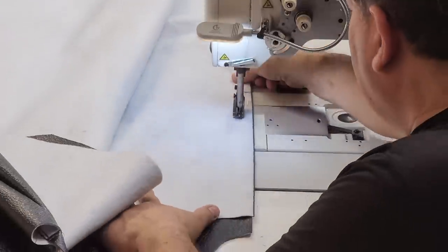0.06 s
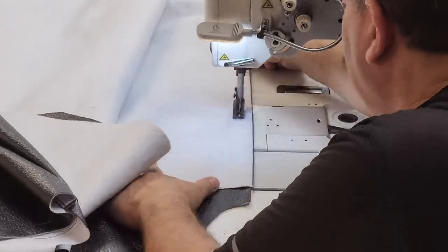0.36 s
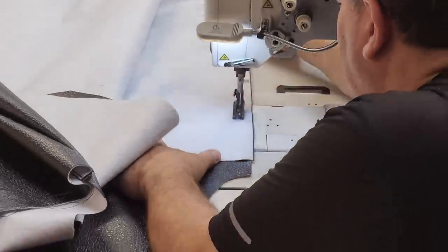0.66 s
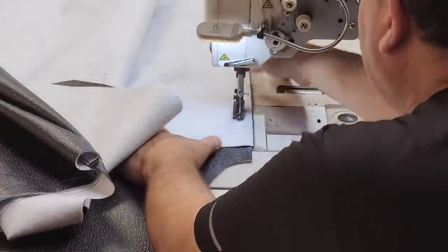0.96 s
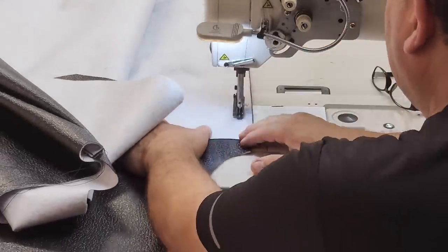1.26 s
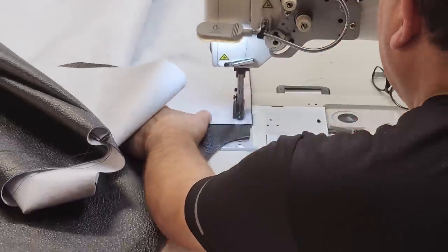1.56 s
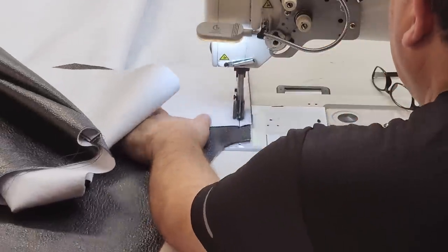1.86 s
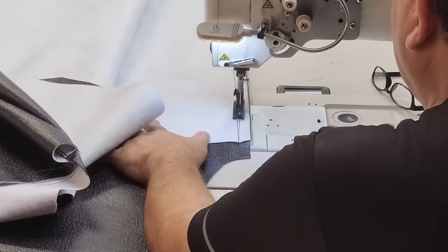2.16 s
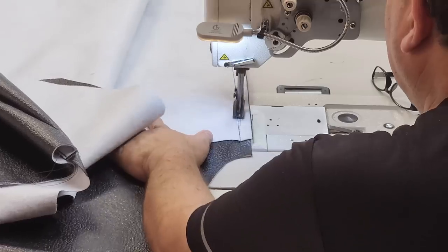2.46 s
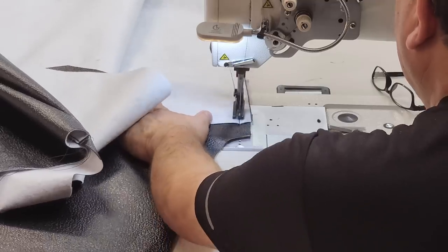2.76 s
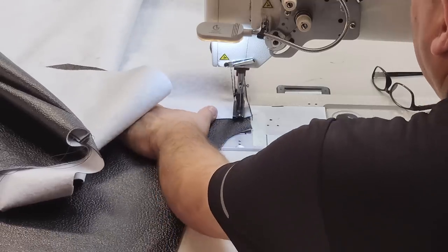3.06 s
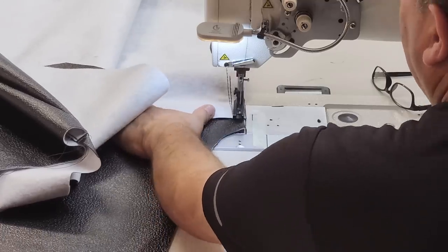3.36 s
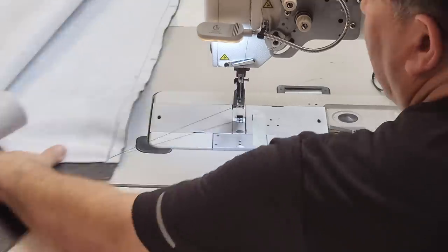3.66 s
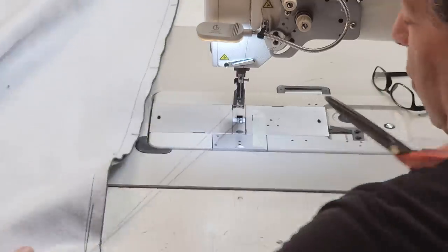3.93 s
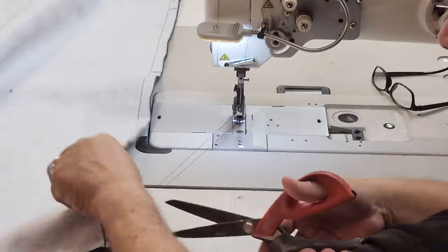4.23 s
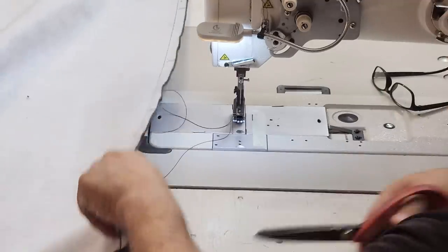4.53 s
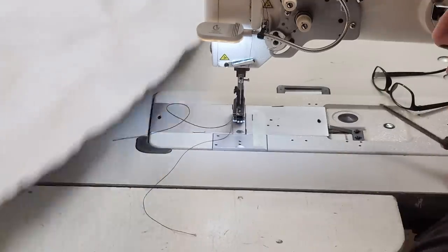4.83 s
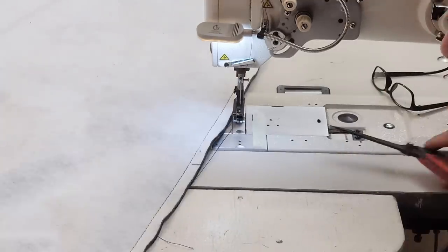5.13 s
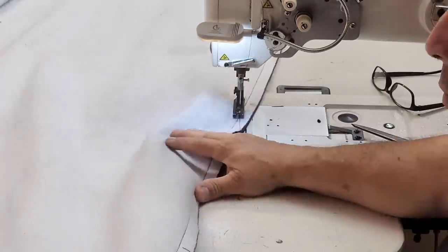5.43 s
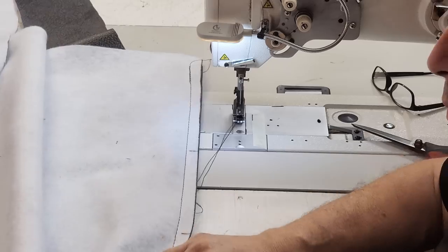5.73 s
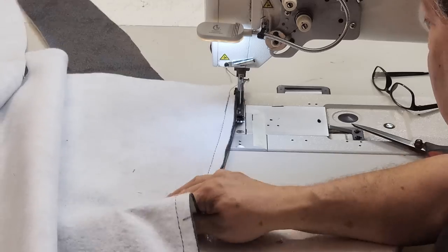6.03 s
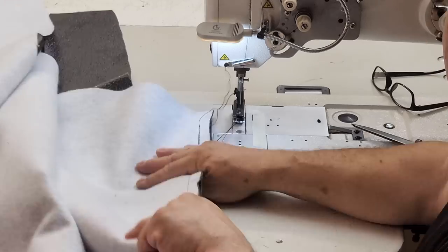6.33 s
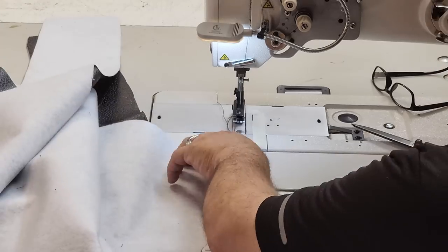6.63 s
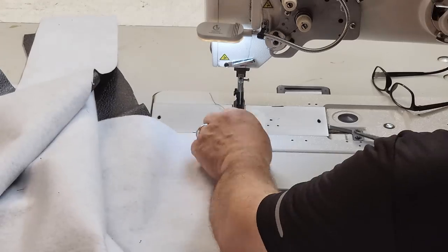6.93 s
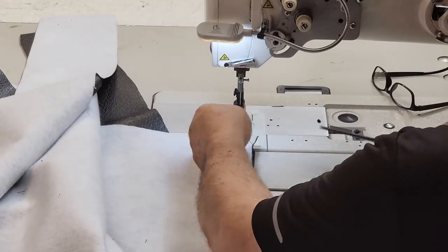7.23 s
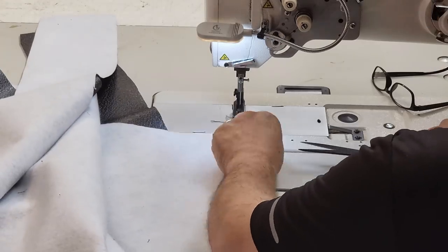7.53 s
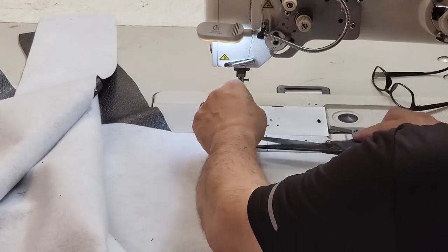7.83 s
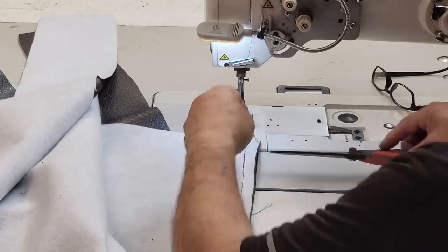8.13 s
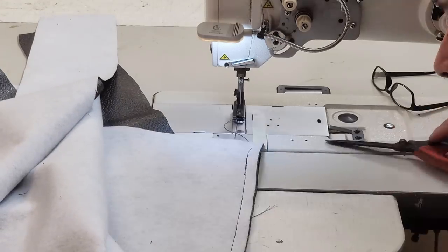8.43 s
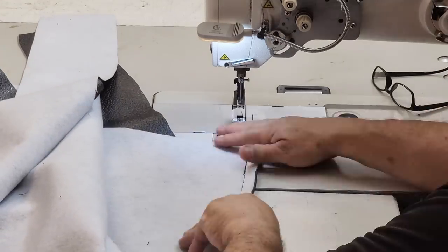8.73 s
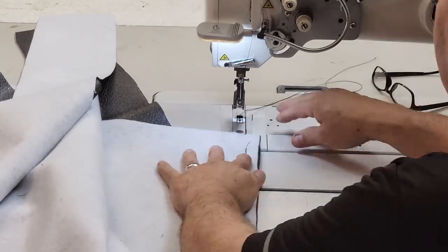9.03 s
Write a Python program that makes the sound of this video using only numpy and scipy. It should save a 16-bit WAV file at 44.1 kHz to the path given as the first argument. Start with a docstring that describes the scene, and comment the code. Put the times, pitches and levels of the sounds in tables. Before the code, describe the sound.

Close up in a small, dry workshop, a heavy sewing machine rattles through a short run with a low motor drone, pauses, then stitches for longer with sharp steel knocks. After it stops, upholstery vinyl slides over the table with a soft hiss and lands with a slap. Large shears cut threads once before the slap and again near the end, among small clinks, taps and dull thuds. A faint rumble lies underneath.

```python
"""Over the low rumble of a small, dry workshop, an industrial walking-foot sewing machine stitches
upholstery vinyl in two bursts: each stitch pulls hissing thread, rings the cast head and shakes the table.
In the second burst the presser foot knocks over a thick seam. Then the sheet is dragged across the table
with a hiss of friction, flipped, slapped down and slid again. Last, big shears scrape and ring as they
cut the threads. All is heard from over the worker's shoulder."""
import sys
import numpy as np
from scipy import signal
from scipy.fft import rfft, irfft, next_fast_len
from scipy.io import wavfile
from scipy.ndimage import uniform_filter1d

SR = 44100
rng = np.random.default_rng(int(sys.argv[2]) if len(sys.argv) > 2 else 0)


def dump_mix(stems):
    """Bounce the given channels to the path in sys.argv[1] as a 16-bit WAV at rate SR."""
    frames = np.atleast_2d(stems).T  # one column per channel
    limited = np.clip(frames, -1, 1)  # hard clip at full scale
    pcm = np.round(limited * 32767).astype(np.int16)
    wavfile.write(sys.argv[1], SR, pcm)


N = 405279
T = np.arange(N) / SR
TAIL = T[:SR // 5]  # time axis of one short event
SEWN = int(3.1 * SR)  # samples that hold the sewing

# the handwheel's progress, one list per burst: time_s, stitch_count
BURSTS = [
    [(0, 0), (.029, 1), (.169, 6), (.351, 13), (.516, 19), (.667, 25), (.835, 31), (.925, 33)],
    [(1.16, 0), (1.199, 1), (1.438, 7), (1.544, 9), (1.673, 12), (1.745, 14), (1.8, 16), (1.913, 20),
     (1.953, 21), (2.344, 32), (2.408, 34), (2.469, 36), (2.614, 40), (2.859, 47)],
]
# the pedal held down; the first burst fades slightly, the second swells slightly:
# start_s, stop_s, level_db, growth_db_per_s
PEDAL = [(0.0, 0.866, 0.5, -0.5), (1.193, 2.867, -0.86, 1)]
# modes of the cast head: pitch_hz, level_db, t60_s
HEAD_MODES = [(480, -16, 0.042), (830, -8.5, 0.049), (1470, -7, 0.051), (1570, -1, 0.062), (1610, -4, .045),
              (1753, -7.5, .035), (2047, -9.5, 0.065), (3033, -17.5, 0.051), (3450, -19, 0.031),
              (7220, -21.5, 0.042)]
# spectrum of thread or a sheet's edge brushing past: frequency_hz, level_db
HISS_SPECTRUM = [(1500, -14.5), (3300, 4.5), (5200, -3), (7300, -4), (9700, -4.5), (10700, -7), (11700, -2),
                 (13400, -2.5), (15500, -11)]
# spectrum of the low rumble: frequency_hz, level_db
RUMBLE_SPECTRUM = [(20, -6), (45, 1.5), (90, 0.5), (130, -1), (175, -12.5), (250, -22.5), (420, -34.5),
                   (800, -38), (2000, -83.5)]


def amp(db):
    """Decibels to amplitude ratio."""
    return 10 ** (np.asarray(db) / 20)


def unit(x):
    """Normalise to rms 1."""
    return x / np.sqrt(np.mean(x ** 2))


def running(x):
    """Normalise to rms 1 over the time the machine runs."""
    running_s = sum(burst[-1][0] - burst[0][0] for burst in BURSTS)
    return x / np.sqrt(np.sum(x ** 2) / SR / running_s)


def peak(x, db):
    """Normalise the largest excursion to a level."""
    return x * amp(db) / np.abs(x).max()


def add(out, start_s, x):
    """Superpose x on out from start_s on."""
    i = max(int(start_s * SR), 0)
    out[i:i + len(x)] += x[:len(out) - i]


def swell(t, peak_s):
    """A pulse that reaches 1 at peak_s and decays exponentially."""
    return t / peak_s * np.exp(1 - t / peak_s)


def stroke(start_s, length_s, rise_s, release_s):
    """A trapezoidal envelope: rise, hold, release."""
    return np.clip(np.minimum((T - start_s) / rise_s, (start_s + length_s - T) / release_s), 0, 1)


def wander(rate_hz):
    """Slow random modulation with a spread near 1."""
    knots = np.arange(0, T[-1] + 1, 1 / rate_hz)
    return 1.2 * np.interp(T, knots, rng.standard_normal(len(knots)))


def shape(x, spectrum):
    """Filter by a curve of (frequency_hz, level_db) points, rolling off below the first."""
    hz, db = np.transpose(spectrum)
    size = next_fast_len(len(x) + 2048)
    f = np.maximum(np.fft.rfftfreq(size, 1 / SR), 1)
    roll_off = np.minimum(f / hz[0], 1) ** 2
    gain = amp(np.interp(np.log(f), np.log(hz), db))
    return irfft(rfft(x, size) * roll_off * gain, size)[:len(x)]


def noise(spectrum, size=N, grit_db=0):
    """Coloured noise of rms 1; grit makes it a dense crowd of unequal impulses."""
    sizes = amp(grit_db * np.minimum(rng.exponential(size=size), 4)) if grit_db else 1
    return unit(shape(rng.standard_normal(size) * sizes, spectrum))


def ring(x, modes):
    """Modal resonance: convolve with a sum of damped sinusoids, scaled to unit energy."""
    body = sum(amp(db) * np.sin(2 * np.pi * hz * TAIL) * np.exp(-np.log(1000) * TAIL / t60)
               for hz, db, t60 in modes)
    return signal.fftconvolve(x, body / np.linalg.norm(body))[:len(x)]


def struck(modes, spread_db=3.0, detune=0.023):
    """Point of impact and grip shift the pitch and strength of each mode from blow to blow."""
    chance = rng.standard_normal((len(modes), 2))
    return [(hz * (1 + detune * a), db + spread_db * b, t60)
            for (hz, db, t60), (a, b) in zip(modes, chance)]


def background():
    """Ambient noise: a slowly drifting rumble under faint, steady air."""
    air_spectrum = [(120, -34), (200, 0), (923, -13.5), (1230, -13.5), (2600, -21.5), (5800, -26),
                    (6470, -23.5), (9830, -33), (12900, -23.5), (15500, -30.5)]  # frequency_hz, level_db
    rumble_drift = [(1.05, -52.5), (3.3, -59.5), (4.5, -63.5), (5.1, -54.5), (6.1, -55), (7, -48),
                    (7.75, -51), (8.2, -57.5), (8.5, -48.5), (9.2, -45.5)]  # time_s, level_db
    rumble = noise(RUMBLE_SPECTRUM) * amp(np.interp(T, *np.transpose(rumble_drift)))
    return rumble + noise(air_spectrum) * amp(-73.5)


def room(x, t60_s=0.23, wet_db=-13):
    """Reverberation: fabric absorbs the reflections, so the diffuse tail is short."""
    tail = rng.standard_normal(len(TAIL)) * np.exp(-np.log(1000) * TAIL / t60_s) * (TAIL > .006)
    tail = shape(tail / np.linalg.norm(tail), [(60, -5.5), (400, 0.5), (4000, -5.5), (15000, -6.5)])
    return x + amp(wet_db) * signal.fftconvolve(x, tail)[:N]


def creases():
    """Bending vinyl and plucked threads release sparse transients at random, most of them weak."""
    spells = [(2.967, 3.546, 45, -63.5), (4.047, 4.701, 25, -65), (4.971, 5.17, 35, -58),
              (5.734, 5.853, 40, -61), (6.501, 7.301, 12, -69)]  # spells of crackling: start_s, end_s, crackles_per_s, weakest_peak_db
    out = np.zeros(N)
    for start, end, rate, db in spells:
        for place, size, colour in rng.random((int((end - start) * rate), 3)):
            hz = 1500 * 3 ** colour
            burst = swell(TAIL[:2048], .0015) * rng.standard_normal(2048)
            tick = shape(burst, [(hz / 4, -14), (hz, 0), (4 * hz, -15)])
            add(out, start + place * (end - start), peak(tick, db + 10 * size ** 3))
    return out


def sliding(uneven_db=1.5, fidget_db=3.0, fade_s=0.065):
    """Friction noise: the fleece backing's fibres tick over the table under an uneven hand."""
    fleece_spectrum = [(88, -34), (150, -0.5), (193, -8), (346, -2), (404, 0), (1170, -4), (2020, -4.5),
                       (2410, -8.5), (3550, -11.5), (5030, -17), (12000, -20.5), (15500, -21.5)]  # frequency_hz, level_db
    # strokes of sheet, hands and shears: start_s, length_s, rise_s, level_db, relative_treble_db
    slides = [(2.96, 0.097, 0.019, -64, -9), (3.098, .1, .045, -56.5, -10), (3.25, 0.096, 0.045, -62, -5),
              (3.45, 0.59, 0.22, -51.5, -11), (4.707, 0.29, 0.1, -43, -10.5),
              (5.04, 0.12, 0.05, -59.5, -14), (5.25, 0.11, .02, -62, -4), (5.302, .455, 0.09, -45, -11),
              (5.83, 0.19, 0.043, -53.5, -11.5), (6.011, 0.081, 0.022, -56.5, -12),
              (6.181, .29, .19, -49, -13), (6.558, 0.078, 0.037, -57, -7),
              (8.158, 0.054, .015, -54.5, -7.5), (8.413, 0.17, .02, -59, -19),
              (8.666, 0.14, .025, -59.5, -11), (8.785, 0.058, 0.029, -63, 8), (9.031, 0.16, .012, -65, -8)]
    # the held sheet rustling between strokes: start_s, length_s, level_db, relative_treble_db
    rustles = [(2.947, 3.79, -73, -2), (6.66, 0.646, -73, -9)]
    low_pass = signal.butter(2, 5500, fs=SR, output="sos")
    high_pass = signal.butter(2, 5000, "high", fs=SR, output="sos")
    rub = signal.sosfilt(low_pass, noise(fleece_spectrum, grit_db=2.5))
    fibres = signal.sosfilt(high_pass, noise(fleece_spectrum, grit_db=3.0))
    hand, fidget = amp(uneven_db * wander(30)), amp(fidget_db * wander(25))
    pushes = [(hand * amp(db) * stroke(s, length, rise_s, fade_s), top)
              for s, length, rise_s, db, top in slides]
    pushes += [(fidget * amp(db) * stroke(s, length, fade_s, fade_s), top)
               for s, length, db, top in rustles]
    # incoherent sources add in power
    body = np.sqrt(sum(push ** 2 for push, _ in pushes))
    treble = np.sqrt(sum((push * amp(top)) ** 2 for push, top in pushes))
    return amp(-1) * body * rub + amp(-3) * treble * unit(fibres)


def taps():
    """Light impacts on the table: each tap rings the top's modes, its colour centred on its own brightness."""
    # hands, shears and the rebounding sheet tap the table: time_s, peak_db, brightness_hz
    touches = [(3.131, -46.5, 690), (4.575, -53, 1310), (5.241, -28, 1090), (5.268, -35, 560),
               (6.037, -55, 420), (6.662, -54.5, 1090), (6.786, -44.5, 1200), (6.822, -44, 560),
               (6.905, -49.5, 474), (7.012, -50, 1100), (7.036, -51, 950), (7.1, -59, 1000),
               (7.14, -53, 1200), (7.58, -60, 1500), (7.68, -60.5, 1690), (8.561, -31, 1180),
               (8.923, -54.5, 905), (9.062, -46, 1620), (9.105, -42, 1040)]
    plate_modes = [(558, 9.5, 0.019), (805, -4, 0.027), (935, -7.5, 0.075), (1180, -2.5, 0.027),
                   (1394, 4.5, 0.021), (1776, -2, 0.023), (2140, -2.5, 0.022)]  # the tapped top: pitch_hz, level_db, t60_s
    out = np.zeros(N)
    for s, db, hz in touches:
        force = swell(TAIL, 0.0044) ** 3 + amp(-11) * swell(TAIL, 0.013) ** 2
        contact = force * rng.standard_normal(len(TAIL))
        ringing = amp(-7) * ring(contact, struck(plate_modes, spread_db=1.5))
        colour = [(hz / 4, -17), (hz / 2, -10), (hz, 0), (2 * hz, -5), (3 * hz, -14),
                  (8 * hz, -34), (16 * hz, -46)]
        add(out, s - .002, peak(shape(contact + ringing, colour), db))
    return out


def thuds():
    """Damped oscillation of the bumped table, the taut sheet and air trapped as it lands."""
    bumps = [(0.07, -21.5, 101, 0.018), (3.0, -49, 90, 0.013), (3.57, -48.5, 95, 0.011),
             (3.84, -49, 240, 0.0047), (4.211, -47, 88, 0.0053), (4.714, -30, 228, 0.0028),
             (4.717, -33, 398, 0.0028), (4.729, -33.5, 172, 0.0028), (5.2148, -15.5, 728, 0.002),
             (5.217, -24, 158, 0.0053), (5.225, -32, 101, 0.0082), (5.245, -33, 74, 0.02),
             (5.27, -44, 114, 0.024), (6.153, -28.5, 81, 0.0075), (6.58, -38.5, 91, 0.0094),
             (8.687, -31.5, 78.5, 0.0067), (9.103, -39.5, 163, 0.0078)]  # start_s, level_db, pitch_hz, rise_s
    out = np.zeros(N)
    for s, db, hz, rise_s in bumps:
        add(out, s, amp(db) * swell(TAIL, rise_s) * np.sin(2 * np.pi * hz * TAIL))
    return out


def slap(landing_s=5.2145, flap_db=-28, brush_db=-43):
    """A distributed impact: the flipped sheet's edge brushes down first and the rest flaps after it."""
    flap_spectrum = [(150, -29.5), (260, -0.5), (391, -10.5), (495, 1.5), (960, -8), (1440, -10),
                     (1600, -3.5), (1930, -14.5), (2130, -8), (2700, -20), (15000, -58.5)]  # frequency_hz, level_db
    out = np.zeros(N)
    brush = amp(brush_db) * swell(TAIL, 0.0028) * noise(HISS_SPECTRUM, len(TAIL))
    add(out, landing_s - .008, brush)
    flap = swell(TAIL, 0.0042) + amp(-13.5) * swell(TAIL, 0.01)
    add(out, landing_s + .002, amp(flap_db) * flap * noise(flap_spectrum, len(TAIL)))
    return out


def shears(lead_s=0.0099):
    """Friction of blade on blade grows until they close and excites their briefly ringing modes."""
    # the shears close or scrape along the table, or small steel parts clink: time_s, peak_db, scrape_s
    snips = [(0.92, -49, 0.0059), (1.0842, -55.5, 0.005), (3.0914, -50, 0.0065), (3.3194, -52, 0.0074),
             (3.46, -50, 0.0087), (4.4468, -44, 0.013), (4.4636, -28.5, 0.0075), (6.541, -58, 0.008),
             (7.0108, -46, 0.0079), (7.034, -50.5, 0.0048), (7.137, -65, 0.01), (8.0589, -30, 0.011),
             (8.4123, -38, 0.016), (8.432, -47.5, 0.03), (8.462, -48.5, 0.038), (8.4988, -40.5, 0.0092),
             (8.513, -46, 0.007)]
    grind_spectrum = [(500, -24), (1100, -11), (1600, 1.5), (2050, 6), (2700, -2), (3400, 3), (4500, -4),
                      (6300, -5.5), (9000, -15), (15000, -20)]  # frequency_hz, level_db
    blade_modes = [(1504, 5, 0.048), (2083, 10, 0.05), (2040, -16, .05), (2770, 9, 0.051), (3370, -14, .04),
                   (5600, -10, .04)]  # pitch_hz, level_db, t60_s
    out = np.zeros(N)
    for s, db, scrape_s in snips:
        scrape = swell(TAIL, lead_s + scrape_s / 2) ** 6 + amp(-16) * swell(TAIL, .014) ** 2
        grind = scrape * noise(grind_spectrum, len(TAIL), grit_db=3.0)
        force = scrape * rng.standard_normal(len(TAIL))
        blades = ring(force, struck(blade_modes, spread_db=1, detune=.008))
        add(out, s - lead_s, peak(grind + amp(-4) * blades, db))
    return out


def motor(level_db=-30, sag_db_per_s=8, waver=.04, rough_db=2.4):
    """Forced vibration: the motor drones in the stand through the first burst, wavering and fading."""
    drone_pitch = [(0.05, 106.9), (.15, 100.4), (.26, 129.4), (.5, 140.4), (.6, 135.1), (.83, 132.2)]  # climbs as the motor takes the load: time_s, pitch_hz
    hz = np.interp(T, *np.transpose(drone_pitch)) * (1 + waver * wander(38))
    on = stroke(0, PEDAL[0][1], rise_s=.075, release_s=.04)
    gain = amp(level_db - sag_db_per_s * T + rough_db * wander(70))
    return np.sin(2 * np.pi * np.cumsum(hz) / SR) * on * gain


def presser_foot(decay_ratio=0.87):
    """Hard impacts of steel on the needle plate ring the head, damped by pressing into the seam."""
    knocks = [(1.546, -31.5), (1.627, -29), (1.798, -21), (1.82, -21.5), (1.853, -23), (1.8824, -28),
              (1.91, -20.5), (1.948, -27.5), (1.9817, -28.5), (2.024, -21), (2.0581, -22.5), (2.0967, -24),
              (2.1286, -20), (2.165, -24), (2.1966, -20.5), (2.2026, -25), (2.2364, -21.5), (2.273, -24.5),
              (2.3083, -23.5), (2.343, -27.5), (2.614, -27.5), (2.7933, -22.5)]  # the foot hammers on thick layers: time_s, peak_db
    crack_spectrum = [(200, -17.5), (700, 1.5), (1200, -14), (1700, 5), (2500, -6), (3600, -2.5),
                      (5000, -16), (8000, -13.5), (15000, -30.5)]  # frequency_hz, level_db
    out = np.zeros(N)
    for s, db in knocks:
        contact = swell(TAIL, .0021) ** 2 + amp(-6.5) * swell(TAIL, 0.0045)
        crack = contact * noise(crack_spectrum, len(TAIL), grit_db=2)
        modes = [(hz, mode_db, decay_ratio * t60) for hz, mode_db, t60 in struck(HEAD_MODES, detune=.034)]
        casting = ring(contact * rng.standard_normal(len(TAIL)), modes)
        add(out, s - .001, peak(crack + amp(-0.5) * casting, db))
    return out


def stitch_times():
    """Rotation sets the rhythm: one stitch per turn of the handwheel, and one more as it runs out."""
    times = []
    for s, count in map(np.transpose, BURSTS):
        times += [*np.interp(np.arange(1, count[-1] + 1), count, s), s[-1] + .035]
    return times


def each_stitch(push, lag_s, scatter_db, jitter_s):
    """A quasi-periodic pulse train: one push per stitch, scattered in size and timing."""
    times = stitch_times()
    out = np.zeros(SEWN)
    for s, (size, slip) in zip(times, rng.standard_normal((len(times), 2))):
        add(out, s + lag_s + jitter_s * slip, amp(scatter_db * size) * push)
    return out


def effort(law, cruise_per_s=30):
    """A part's amplitude runs up, follows a power law of the stitching speed and runs down."""
    cruise_db, doubling_db, up_db_per_s, down_db_per_s = law
    t, gain = T[:SEWN], 0
    for (s, count), (start, stop, db, growth) in zip(map(np.transpose, BURSTS), PEDAL):
        speed = (np.diff(count) / np.diff(s))[np.searchsorted(s[1:-1], t)]
        pace_db = doubling_db * np.log2(uniform_filter1d(speed, SR // 20) / cruise_per_s)
        coast_db = up_db_per_s * np.maximum(start - t, 0) + down_db_per_s * np.maximum(t - stop, 0)
        gain = gain + amp(cruise_db + db + pace_db + growth * (t - (start + stop) / 2) - coast_db)
    return gain


def thread():
    """Friction of thread through vinyl: a hiss that pulses with each pull."""
    law = (-55.9, 1.5, 328, 548)  # hiss against speed: cruise_db, doubling_db, up_db_per_s, down_db_per_s
    seam = (1.72, 2.2, -4)  # the thread runs slacker over the thick seam: start_s, end_s, change_db
    start_s, end_s, change_db = seam
    slack = amp(change_db * stroke(start_s, end_s - start_s, 0.045, 0.022)[:SEWN])
    pull = running(each_stitch(swell(TAIL, 0.0065) ** 2, lag_s=-0.0085, scatter_db=3.9, jitter_s=0.001))
    hiss = (pull + amp(-6.5)) * noise(HISS_SPECTRUM, SEWN, grit_db=3.5) * amp(1.5)
    return effort(law) * slack * hiss


def table_shake():
    """Structure-borne sound: needle bar and feet land in turn and drive the table's low modes."""
    law = (-37.5, 6, 300, 168)  # shake against speed: cruise_db, doubling_db, up_db_per_s, down_db_per_s
    table_modes = [(42.6, -19.5, .1), (83, 2, 0.15), (97.7, -1.5, 0.13), (133.3, 1.5, 0.16),
                   (164, -3.5, 0.062), (229, -11, 0.082)]  # the top under the machine: pitch_hz, level_db, t60_s
    needle_bar = each_stitch(swell(TAIL, 0.0008), lag_s=0, scatter_db=0.5, jitter_s=0.0012)
    feet = each_stitch(swell(TAIL, 0.001), lag_s=0.0163, scatter_db=2, jitter_s=0.00332)
    boom = running(ring(np.diff(needle_bar + feet, prepend=0), table_modes)) * amp(-2)
    return effort(law) * (boom + noise(RUMBLE_SPECTRUM, SEWN) * amp(-6))


def linkage():
    """Repeated impacts: the linkage clacks and excites the head's modes; gears and hook rattle between."""
    law = (-45.5, 4, 452, 298)  # clatter against speed: cruise_db, doubling_db, up_db_per_s, down_db_per_s
    clatter_spectrum = [(170, -4), (320, -9), (500, -8), (820, -9), (1190, -13.5), (1550, -12.5),
                        (1900, -10), (2500, -18), (3650, -17.5), (5500, -33.5), (9700, -33), (10700, -43),
                        (15000, -41.5)]  # frequency_hz, level_db
    pulses = running(each_stitch(swell(TAIL, 0.0062), lag_s=0.0005, scatter_db=1.5, jitter_s=0.0017))
    strikes = running(each_stitch(swell(TAIL, 0.0032), lag_s=0.00024, scatter_db=1.3, jitter_s=0.00076))
    clacks = pulses * noise(clatter_spectrum, SEWN, grit_db=3.5) * amp(-0.5)
    rattle = noise(clatter_spectrum, SEWN, grit_db=3) * amp(0.5)
    head = ring((strikes + amp(-8)) * rng.standard_normal(SEWN), HEAD_MODES) * amp(-1.5)
    return effort(law) * (clacks + rattle + head)


def extended_sources():
    """Incoherent radiation from many points of the machine, the sheet and the table, over the ambience."""
    machine = np.pad(thread() + table_shake() + linkage(), (0, N - SEWN))
    return machine + presser_foot() + sliding() + creases() + shears() + taps() + slap() + background()


def scene():
    """Interaural decorrelation: bass is central; extended sources differ at each ear, most in the treble."""
    width = [(60, -21.5), (140, -16.5), (280, -13), (550, -6), (1100, -3.5), (2200, -3), (4500, -1.5),
             (9000, 0), (15000, 0.1)]  # side against mid: frequency_hz, level_db
    mid = room(extended_sources() + motor() + thuds())
    side = shape(room(extended_sources()), width)
    return np.array([mid + side, mid - side])


def record(dry, top_hz=15850):
    """Band limiting: a steep elliptic low-pass removes the highest treble."""
    return signal.sosfilt(signal.ellip(10, .2, 70, top_hz, fs=SR, output="sos"), dry)


dry = scene()
out = record(dry)
dump_mix(out)
```